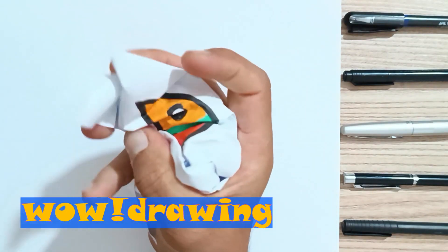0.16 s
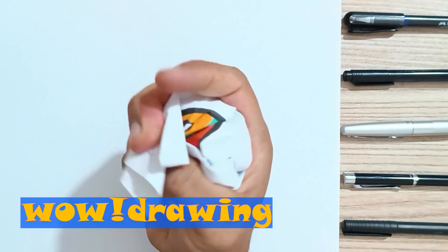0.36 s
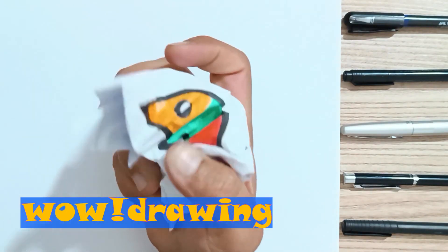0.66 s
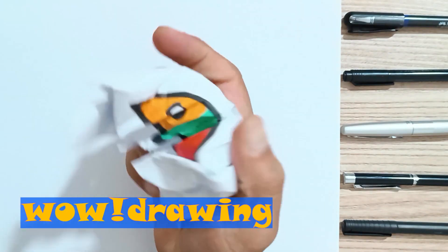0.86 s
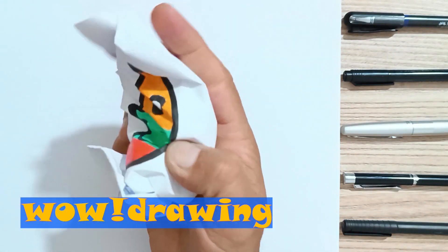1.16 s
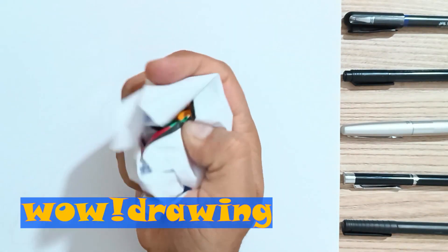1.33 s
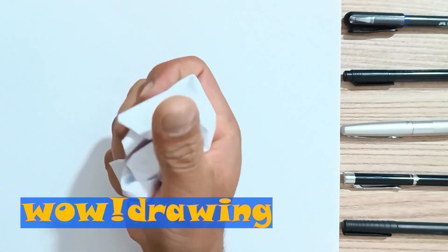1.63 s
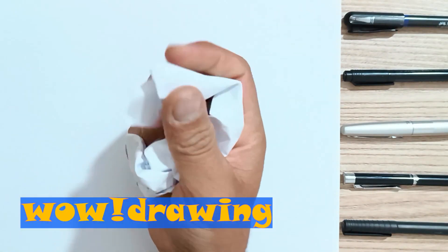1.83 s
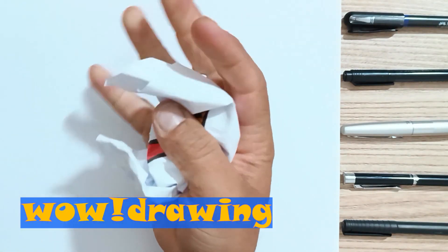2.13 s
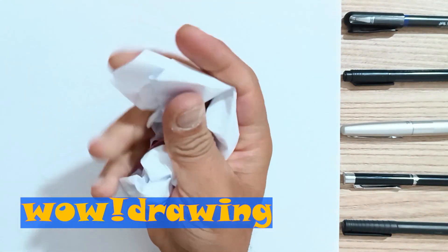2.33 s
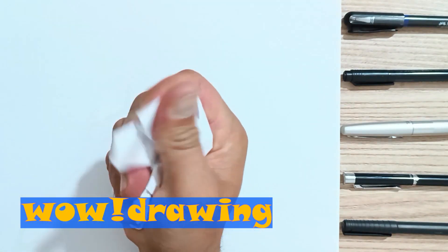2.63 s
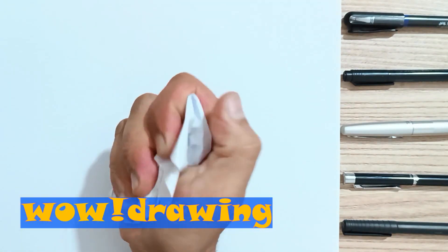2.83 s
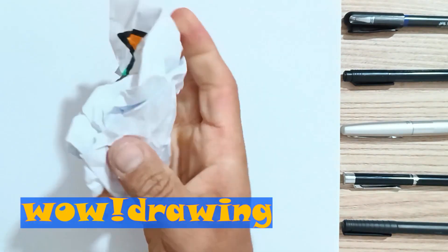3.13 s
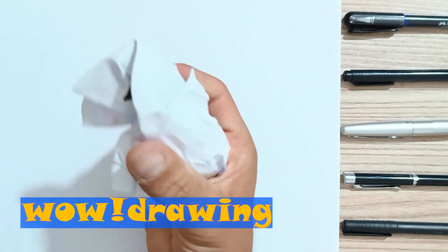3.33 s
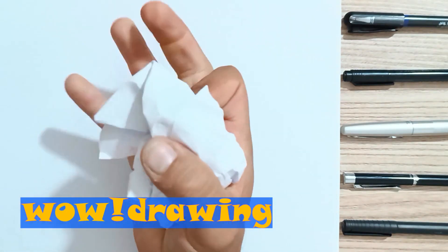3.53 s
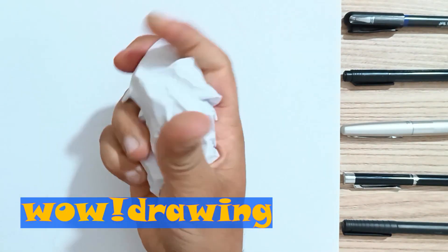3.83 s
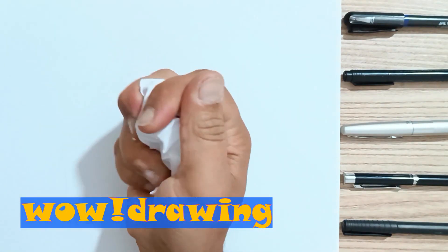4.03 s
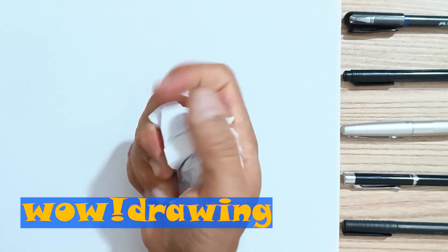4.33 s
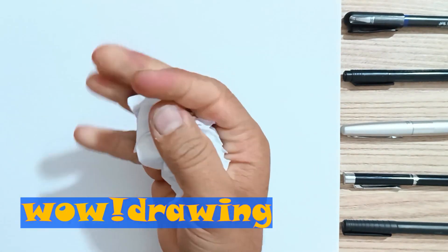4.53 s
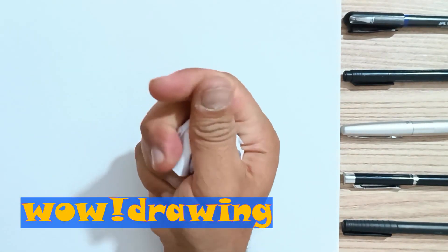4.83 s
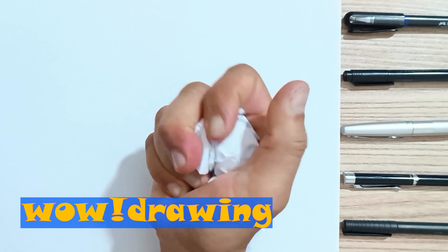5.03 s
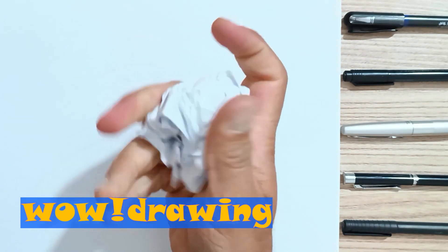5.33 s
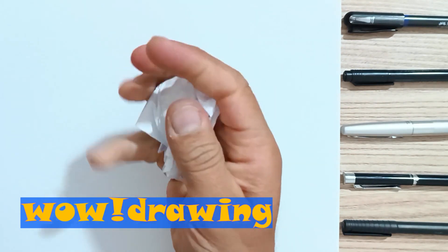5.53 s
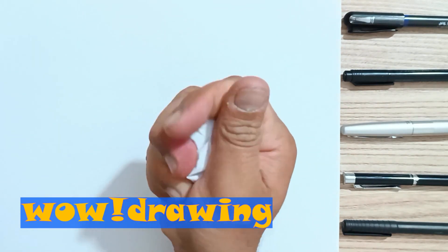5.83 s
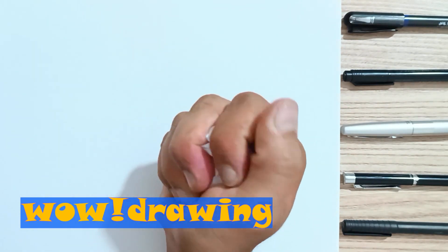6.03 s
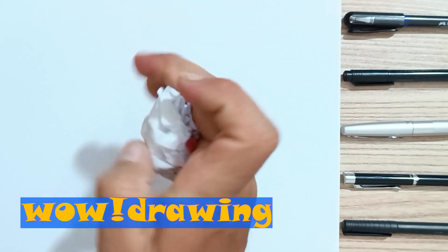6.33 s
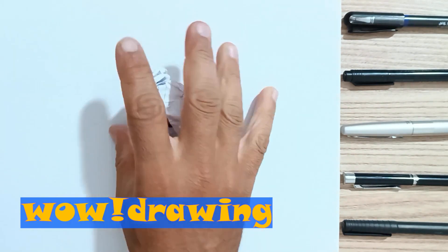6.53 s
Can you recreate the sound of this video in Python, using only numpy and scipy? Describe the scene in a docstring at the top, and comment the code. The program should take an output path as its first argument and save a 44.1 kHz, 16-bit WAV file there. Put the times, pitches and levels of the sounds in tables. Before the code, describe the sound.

Paper crumpling heard in stereo from nearby above a desk: hard, dry pops and crackles in irregular bursts, with soft hissing friction and dull flexing beneath. After a strong cluster around two seconds the activity eases, leaving small isolated crunches between quiet gaps. A last little flurry precedes a low, muffled thump and slap on the desk top. Short room reflections and quiet, slightly rumbling air surround it.

```python
"""Over a desk in a small room, a hand crumples a sheet of paper into a ball, and the hand meets the desk twice.
Creases buckle with snaps of a few cycles, each on the pitch of its facet, made by noise kicks driving
a damped resonance. Dense small crackle, gritty rubbing and dull flexing are random slips and filtered noise.
The desk top booms as a sum of damped modes; early echoes and a short random-tap tail answer from the room.
Below lies a steady room tone of shaped noise with a lumpy rumble, all in two channels."""
import sys
import numpy as np
from scipy import signal
from scipy.fft import rfft, irfft, next_fast_len
from scipy.io import wavfile
from scipy.ndimage import uniform_filter1d

SR = 44100
rng = np.random.default_rng(int(sys.argv[2]) if len(sys.argv) > 2 else 0)


def master(y):
    """Save y as 16-bit WAV."""
    cut = np.clip(np.atleast_2d(y).T, -1, 1)
    pcm = np.round(cut * 32767)  # scale
    wavfile.write(sys.argv[1], SR, pcm.astype(np.int16))


N = 295029  # length [samples]

# Spectrum of creasing paper, for the crackle and for the sheet around a snap: f/Hz, level/dB
PAPER_SPECTRUM = [(700, -19), (1000, -1.5), (1500, -9), (1950, 5.5), (2600, -3.5), (4000, 0.5), (9000, -43)]


def amp(db):
    """Level law: 20 dB is a factor of ten in amplitude."""
    return 10 ** (np.asarray(db) / 20)


def evened(x):
    """Normalisation by mean square: scales to rms 1."""
    return x / np.sqrt(np.mean(x ** 2) + 1e-20)


def read(points, hz):
    """Logarithmic pitch scale: interpolates a table linearly along log frequency."""
    f, value = np.transpose(points)
    return np.interp(np.log(hz + 1), np.log(f + 1), value)


def colour(x, points, lag_s=0.):
    """Linear filtering: multiplies the spectrum by a gain, and delays by a phase linear in frequency."""
    size = next_fast_len(x.shape[-1] + 512)
    hz = np.fft.rfftfreq(size, 1 / SR)
    gain = amp(read(points, hz))
    delay = np.exp(-2j * np.pi * hz * lag_s)
    return irfft(rfft(x, size) * gain * delay, size)[..., :x.shape[-1]]


def add(mix, s, sound):
    """Superposition: adds a sound into the mix from a given time in seconds."""
    part = mix[:, round(s * SR):][:, :sound.shape[1]]
    part += sound[:, :part.shape[1]]


def facet(hz, noise, cycles, same):
    """Damped resonance: a noise kick rings a facet for a few ragged cycles, partly different left and right."""
    turns = np.arange(noise.shape[1]) / SR * hz
    kick = noise * turns * np.exp(-turns / (.5 * cycles))  # the crease gives way over a cycle or two
    kick[1] = same * kick[0] + np.sqrt(1 - min(same, 1) ** 2) * kick[1]
    decay = np.exp(-turns / cycles)
    onset = 1 - np.exp(-turns / 1.5)
    ring = np.sin(2 * np.pi * turns) * decay * onset
    pop = signal.fftconvolve(kick, ring[None], axes=1)[:, :len(turns)]
    return pop / abs(pop).max(1, keepdims=True)


def snaps():
    """Buckling: each clear snap is a facet pop, a ragged burst of the whole sheet and a short broad crack."""
    # Clear snaps: t/s, peak level/dB, facet pitch f/Hz, crack level re the pop/dB
    events = [(0.079, -12.5, 3750, -20), (0.097, -13.5, 1100, -20), (0.097, -12, 3600, -12),
              (0.155, -13.5, 2870, -19), (0.239, -11.5, 2300, 8), (0.302, -9, 2250, 0),
              (0.353, -17.5, 2000, -20), (0.433, -8, 4130, 3.5), (0.451, -8, 2440, 0), (0.47, -8, 3800, -6),
              (0.479, -5.5, 3300, -3), (0.631, -15, 2700, -18), (1, -16.5, 1690, -33),
              (1.139, -6, 3200, -10.5), (1.147, -7.5, 2170, -4), (1.206, -13.5, 3860, -27),
              (1.237, -9, 2740, -24), (1.37, -9.5, 1800, -5), (1.386, -6, 2190, -13),
              (1.403, -12.5, 3000, 9), (1.406, -5, 2900, -21), (1.468, -11, 1680, -25),
              (1.497, -11, 3180, -11), (1.633, -12.5, 1840, 11), (1.638, -4, 3770, -13),
              (1.6656, -5, 3880, -13), (1.723, -25, 1470, -11), (1.881, -19.5, 1220, -20),
              (1.924, -19.5, 3120, 11), (1.981, -20.5, 1010, -23), (2.0117, -9.5, 4300, 1),
              (2.023, -20, 2700, -14), (2.0675, -10, 1030, -3), (2.079, -10.5, 1160, -26),
              (2.099, -12, 2520, 11), (2.1076, -16, 3000, 7), (2.141, -21, 1490, -10),
              (2.241, -12.5, 4540, -3.5), (2.254, -7, 1960, -17), (2.269, -1, 1740, -30),
              (2.278, -16, 1920, -16), (2.292, -17.5, 1770, 7), (2.411, -8.5, 1255, -19),
              (2.412, -4, 4630, -20), (2.438, -14, 5530, 9), (2.448, -13.5, 4900, -5),
              (2.486, -11, 3070, -6), (2.67, -9.5, 2090, 10), (2.692, -10, 3320, -19),
              (2.7062, -14, 2570, -2), (3.276, -20, 2130, -7), (3.317, -10.5, 2230, -4.5),
              (3.379, -14, 1980, -2), (3.451, -15, 2780, -28), (3.548, -21.5, 1100, 4.5),
              (3.589, -22, 2040, -19), (3.61, -19, 1880, -20), (3.631, -15, 1880, -12),
              (3.71, -20, 2900, -9), (3.77, -15.5, 2360, 0), (3.917, -17.5, 2780, -16),
              (4.032, -21, 1880, -26), (4.037, -13.5, 2920, -17), (4.061, -32, 2400, -8),
              (4.072, -10, 3240, -12.5), (4.367, -19.5, 1890, 27), (4.504, -18.5, 2020, -21),
              (4.728, -22.5, 1970, -5.5), (5.1381, -22.5, 2600, 13), (4.4095, -28, 2960, 25),
              (5.172, -19, 2800, -5), (5.243, -22, 3000, 19), (5.253, -19, 3020, 12),
              (5.68, -16.5, 1980, -11), (5.692, -20, 2160, -13), (5.709, -15, 3500, -18),
              (5.729, -17, 3200, -7), (5.755, -17.5, 2770, -11), (6.0789, -21.5, 2770, 5),
              (6.248, -27.5, 4440, 23), (6.273, -35, 4140, 8), (6.287, -20.5, 880, 7),
              (6.3039, -13, 2340, -1.5), (6.332, -25, 1740, -19), (6.342, -34, 1800, -5)]
    # Spectrum of the cracks: f/Hz, level/dB
    crack_spectrum = [(700, -90), (2000, 30.5), (6000, 28.5), (10000, 19), (15800, 11.5), (16500, -5)]
    lead_s = .003  # room for the filters to start
    sheet_db, sheet_decay_s = -5.5, 0.00097
    out, noise = np.zeros((2, N)), rng.standard_normal((len(events), 4, 800))
    t = np.maximum(np.arange(800) / SR - lead_s, 0)
    crack_envelope = (1 - np.exp(-t / .0004)) * np.exp(-t / .0014)
    sheet_envelope = t ** 2 * np.exp(-t / sheet_decay_s)
    for (s, db, hz, crack_db), z in zip(events, noise):
        crack = colour((z[2] + .8 * z[2:]) * crack_envelope, crack_spectrum)
        sheet = colour((z[1] + 0.5 * z[2:]) * sheet_envelope, PAPER_SPECTRUM)
        burst = amp(sheet_db) * sheet / abs(sheet).max() + amp(crack_db) * crack / abs(crack).max()
        add(burst, lead_s, facet(hz, z[:2], cycles=1.3, same=.6))
        add(out, s - lead_s, amp(db) * burst / abs(burst).max())
    return out


def flaps():
    """Low resonance: a broad fold flips over with a dull pop that dies within about a cycle."""
    # Flipping folds: t/s, peak level/dB, f/Hz
    folds = [(0.626, -40, 484), (1.248, -30.5, 530), (2.098, -19, 430), (1.387, -19.5, 860),
             (3.11, -36, 330), (3.379, -26.5, 505), (3.547, -30, 420), (4.069, -34.5, 454)]
    out, noise = np.zeros((2, N)), rng.standard_normal((len(folds), 2, 2400))
    for (s, db, hz), z in zip(folds, noise):
        add(out, s, amp(db) * facet(hz, z, cycles=0.74, same=0.57))
    return out


def hand(column, rise_db_per_s, fall_db_per_s):
    """Power summation: each crunch swells, holds and dies away exponentially; overlaps add in power."""
    # Crunches as the fingers close: t at full strength/s, hold/s, crackle level/dB, rubbing level/dB
    crunches = [(0.0, 0.0042, -28.5, -33), (0.186, 0.11, -36.5, -44), (0.252, 0.065, -59, -32.5),
                (0.444, 0.023, -47, -33), (0.636, 0.1, -35.5, -37.5), (0.886, 0.062, -34.5, -44.5),
                (0.996, 0.25, -39.5, -51), (1.248, 0.052, -29, -58), (1.256, 0.21, -36.5, -41.5),
                (1.648, 0.013, -32.5, -39), (1.81, 0.13, -41, -45.5), (2.063, 0.073, -28, -36),
                (2.299, 0.034, -34, -47), (2.385, 0.19, -38, -42), (2.65, 0.09, -43.5, -41.5),
                (2.965, 0.03, -39, -40.5), (3.091, 0.053, -37, -43.5), (3.283, 0.19, -38.5, -43.5),
                (3.546, 0.2, -34.5, -47), (3.889, 0.12, -44, -43.5), (4.028, 0.058, -36.5, -51),
                (4.385, 0.012, -42.5, -51), (4.486, 0.0049, -40.5, -38.5), (4.615, 0.012, -51, -43.5),
                (5.216, 0.056, -44, -44), (5.34, 0.094, -52.5, -48), (5.531, 0.016, -45, -40.5),
                (5.662, 0.035, -42.5, -40.5), (6.319, 0.0033, -40.5, -38.5)]
    rows, t = np.array(crunches)[:, :, None], np.arange(0, N + 64, 64) / SR
    early = np.maximum(rows[:, 0] - t, 0)
    late = np.maximum(t - rows[:, 0] - rows[:, 1], 0)
    power = amp(rows[:, column] - rise_db_per_s * early - fall_db_per_s * late) ** 2
    return np.interp(np.arange(N) / SR, t, np.sqrt(power.sum(0)))


def crunching():
    """Exponential envelope: how hard the paper crackles."""
    return hand(column=2, rise_db_per_s=239, fall_db_per_s=157)


def clumps(per_s, spread_db, clump_s, clump_db):
    """Random point process: sparse slips of uneven size, whose sizes swell together in clumps."""
    swell = evened(uniform_filter1d(rng.standard_normal(N), round(clump_s * SR)))
    size = amp(spread_db * np.minimum(rng.exponential(1, N), 3.2) + clump_db * swell)
    return size * (rng.random(N) < per_s / SR)


def crackle(count=24):
    """Shot noise: many small facets of all pitches pop at random while the hand closes."""
    low_hz, low_gain_db_per_s = 1800, 0.2  # facets below this pitch slowly gain, per octave below it
    slips = clumps(per_s=850, spread_db=4.8, clump_s=.015, clump_db=3.5)
    which, out = rng.integers(0, count, N), np.zeros((2, N))
    for k, hz in enumerate(np.geomspace(800, 8000, count)):
        pop = facet(hz, rng.standard_normal((2, 400)), cycles=1.1, same=0.65)
        pop *= amp(read(PAPER_SPECTRUM, hz)) * np.sqrt(hz) / np.linalg.norm(pop[0])
        octaves_below = max(np.log2(low_hz / hz), 0)
        growth = amp(low_gain_db_per_s * octaves_below * np.arange(N) / SR)
        kicks = growth * slips * (which == k)
        out += signal.oaconvolve(kicks[None], pop, axes=1)[:, :N]
    return crunching() * evened(out)


def rubbing():
    """Friction noise: paper slides on paper and skin, a gritty hiss modulated in short surges."""
    # Spectrum of sliding paper: f/Hz, level/dB
    rub_spectrum = [(900, -5.5), (2000, 14), (4000, 8), (7000, 3.5), (10000, -3), (15500, -9), (16200, -22)]
    slips = clumps(per_s=3500, spread_db=2.5, clump_s=.03, clump_db=5.0)
    grit = .3 + evened(uniform_filter1d(slips, 50))
    hiss = evened(colour(grit * rng.standard_normal((2, N)), rub_spectrum))
    return hand(column=3, rise_db_per_s=332, fall_db_per_s=160) * hiss


def flexing():
    """Low-frequency impulse noise: broad parts of the sheet flap with dull pushes, gradually weaker."""
    # Spectrum of the broad parts: f/Hz, level/dB
    flex_spectrum = [(120, -85), (300, 0.5), (900, -1), (1600, -59)]
    push = clumps(per_s=500, spread_db=3.5, clump_s=.03, clump_db=1.5)
    push = push * (rng.standard_normal(N) + 0.14 * rng.standard_normal((2, N)))  # mostly common to both sides
    weakening = amp(-18.5 - 0.6 * np.arange(N) / SR)
    return crunching() * evened(colour(push, flex_spectrum)) * weakening


def landing():
    """Modal excitation: a slap of crushed paper, and the desk top booms on its low damped modes."""
    # Contacts of the hand with the desk: t/s, slap level/dB, boom level/dB
    contacts = [(4.157, -44, -36), (6.511, -16.5, -20)]
    # Modes of the desk top: f/Hz, level/dB, decay time over 60 dB/s
    modes = [(110.8, -11, 0.5), (121.2, -6, 0.32), (189, -11, 0.13), (269, -3.5, 0.044), (612, -6.5, 0.058),
             (1100, 1, 0.017)]
    # Spectrum of the slap: f/Hz, level/dB
    slap_spectrum = [(100, -9), (300, -9), (1250, -1.5), (2500, -1), (9000, -23.5), (16000, -30)]
    phase_lag_s, swing_up_cycles = .02, 0.81
    t, out = np.arange(9000) / SR, np.zeros((2, N))
    z = rng.standard_normal((3, len(t)))
    slap_envelope = np.exp(-t / 0.016) * (1 - np.exp(-t / 0.0012))
    slap = colour((z[0] + 1.04 * z[1:]) * slap_envelope, slap_spectrum)
    boom = np.zeros(len(t))
    for k, (hz, mode_db, t60) in enumerate(modes):
        # every other mode is inverted; close neighbours beat
        swing = np.sin(2 * np.pi * hz * (t - phase_lag_s) + k * np.pi)
        boom += amp(mode_db - 60 * t / t60) * swing * (1 - np.exp(-t * hz / swing_up_cycles))
    for s, slap_db, boom_db in contacts:
        add(out, s, amp(slap_db) * slap / abs(slap).max() + amp(boom_db) * boom)
    return out


def alike(hz, left, other):
    """Diffuse-field coherence: mixes two random spectra into a pair that is most alike in the bass."""
    # Coherence of diffuse sound: f/Hz, left-right likeness [1]
    coherence = [(130, 0.51), (1500, 0.041), (4000, 0.0092)]
    same = np.clip(read(coherence, hz), -1, 1)[:, None]
    return np.array([left, same * left + np.sqrt(1 - same ** 2) * other])


def room(x):
    """Reverberation: early echoes over sparse taps of random sign, each band decaying at its own rate."""
    # Reflections off desk and near wall: t/s, level/dB
    reflections = [(.0058, -14), (.0105, -13)]
    # Reverberation time: f/Hz, decay time over 60 dB/s
    decay_times = [(150, 0.63), (1500, 0.4), (6000, 0.31), (13000, 0.028)]
    # Initial spectrum of the tail: f/Hz, level/dB
    tail_spectrum = [(600, 2), (2500, 6)]
    taps = np.zeros((2, SR // 2))
    at = np.arange(120, SR // 2 - 20, 20)
    at = at + rng.integers(0, 20, (2, len(at)))
    np.put_along_axis(taps, at, rng.choice([-1., 1.], at.shape), 1)
    hz, t, z = signal.stft(taps, SR, nperseg=256)
    decay_db = read(tail_spectrum, hz)[:, None] - 60 * t / read(decay_times, hz)[:, None]
    tail = signal.istft(alike(hz, *z) * amp(decay_db), SR, nperseg=256)[1]
    tail *= amp(-10) / np.linalg.norm(tail[0])  # tail energy re the direct sound
    for s, db in reflections:
        add(tail, s, amp(db) * np.eye(2))  # each side echoes into itself, the right one sample later
    return signal.fftconvolve(x, tail, axes=1)[:, :N]


def room_tone():
    """Stationary noise: steady air of fixed spectrum, with low rumble whose level varies in slow lumps."""
    # Spectrum of the room tone: f/Hz, level/dB
    tone_spectrum = [(25, -55), (49, -19), (125, -12), (220, -20), (630, -26.5), (4360, -25.5), (8370, -42),
                     (15200, -45.5)]
    # Course of the rumble: t/s, level/dB
    rumble = [(1.5, -3), (4.1, 2), (5.7, -1), (6.2, -1)]
    frames, hz = N // 512 + 5, np.fft.rfftfreq(2048, 1 / SR)
    a, b, c, d, lumps = rng.standard_normal((frames, 1025, 5)).T
    lumps = evened(uniform_filter1d(uniform_filter1d(lumps, 4, 0), 14, 1))  # smooth over frequency, then time
    level_db = np.interp((np.arange(frames) - 2) * 512 / SR, *np.transpose(rumble))
    lumps_db = (2.5 * lumps + level_db) * (hz < 250)[:, None]
    z = alike(hz, a + 1j * b, c + 1j * d) * amp(read(tone_spectrum, hz)[:, None] + lumps_db)
    return amp(-54.5) * evened(signal.istft(z, nperseg=2048, noverlap=1536)[1][:, :N])


def scene():
    """Superposition of direct, reverberant and ambient sound; the right side lags and is coloured."""
    near = snaps() + flaps() + crackle() + rubbing() + flexing() + landing()
    right_spectrum = [(300, 0.5), (700, -2.0), (3000, 1.37), (9000, -3.0)]  # f/Hz, level/dB
    right = colour(near[1], right_spectrum, lag_s=0.00014)  # the right microphone is a little farther
    near = np.array([near[0], right])
    return near + room(near) + room_tone()


def record(dry):
    """Band limitation: the microphones lose the deep bass, then a steep low-pass cuts the top."""
    thin = signal.sosfilt(signal.butter(2, 60, "high", fs=SR, output="sos"), dry)
    low_pass = signal.firwin(511, 16700, window=("kaiser", 9), fs=SR)
    return signal.oaconvolve(thin, low_pass[None], "same")


dry = scene()
out = record(dry)
master(out)
```